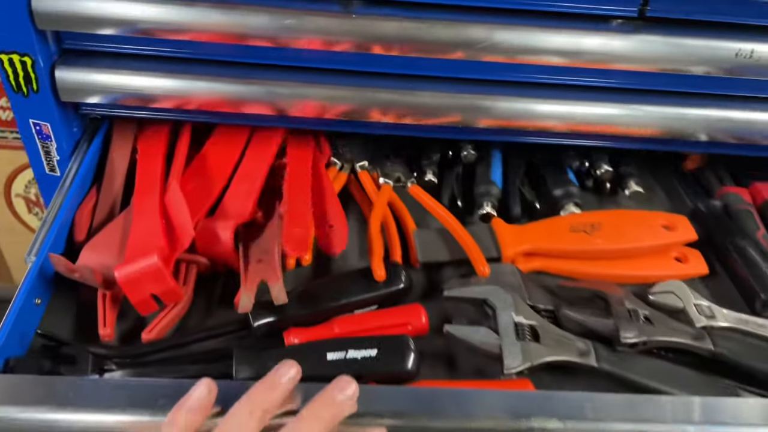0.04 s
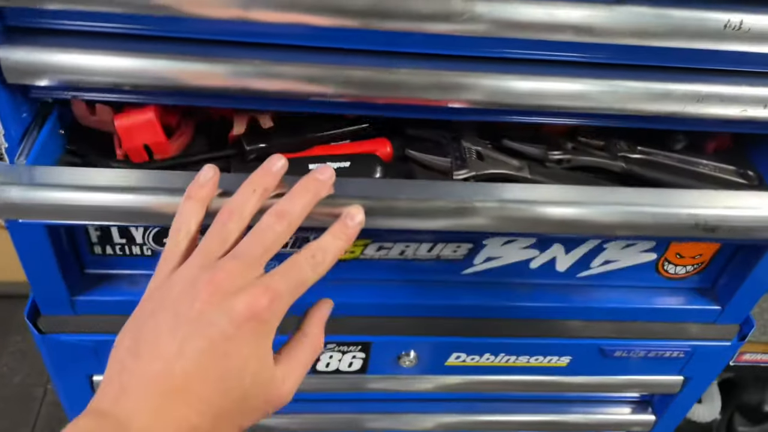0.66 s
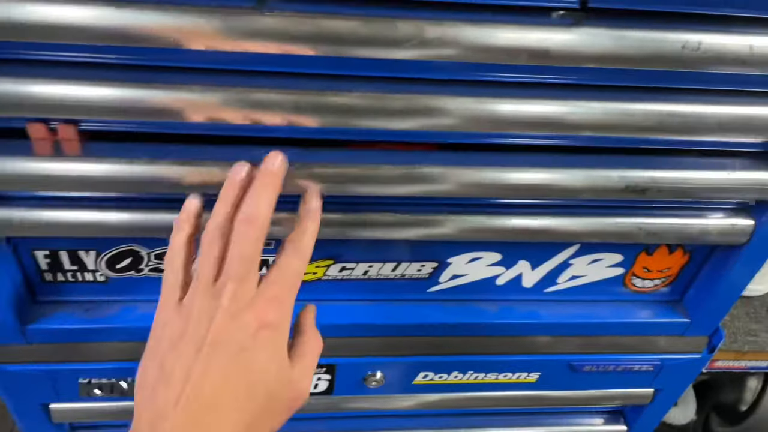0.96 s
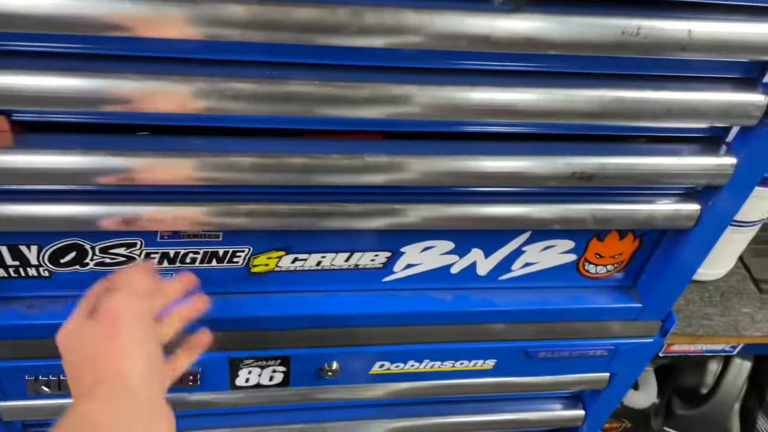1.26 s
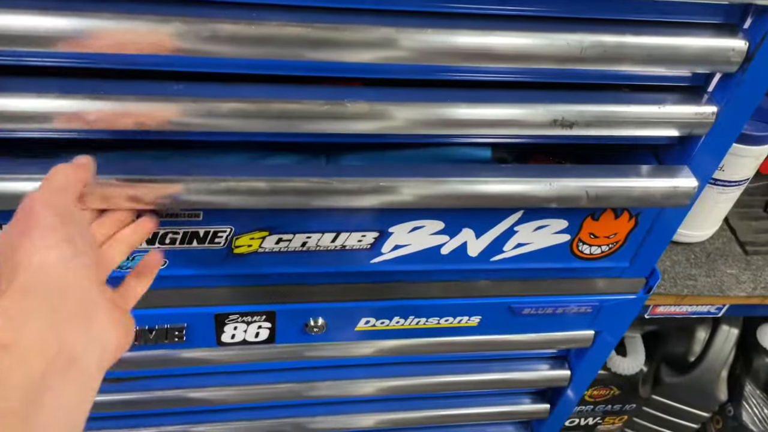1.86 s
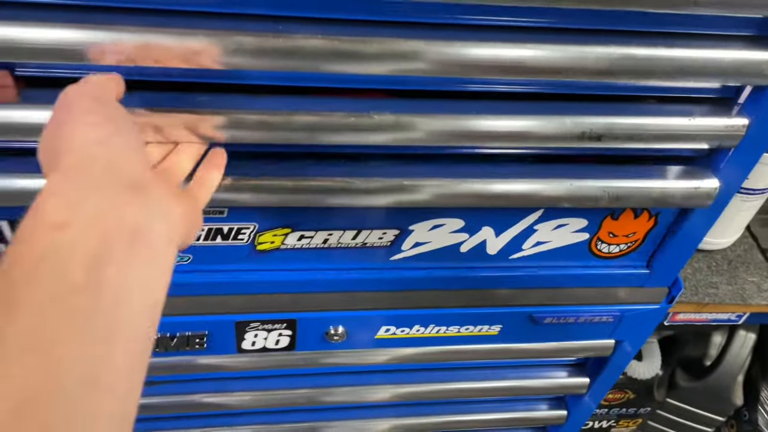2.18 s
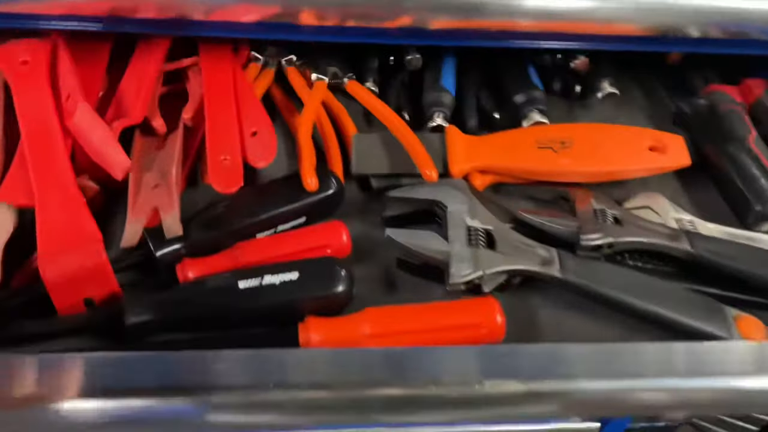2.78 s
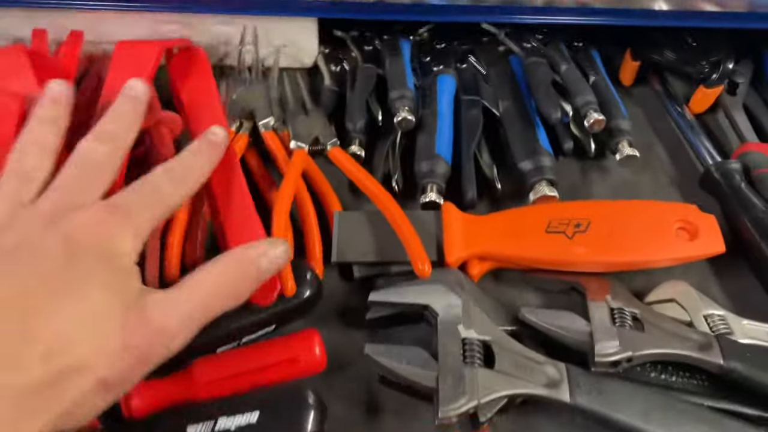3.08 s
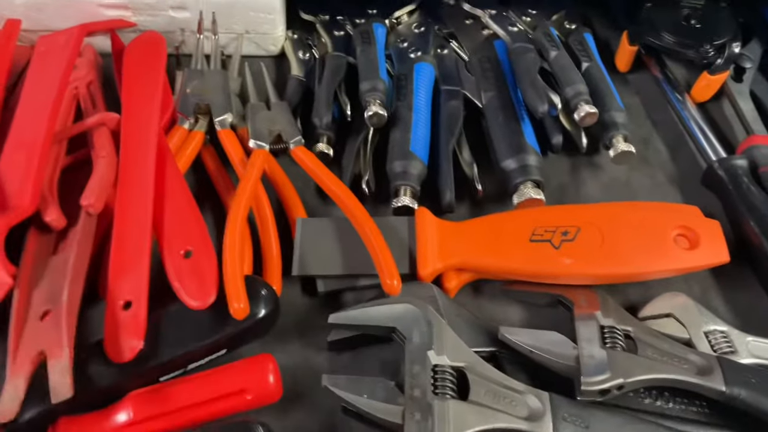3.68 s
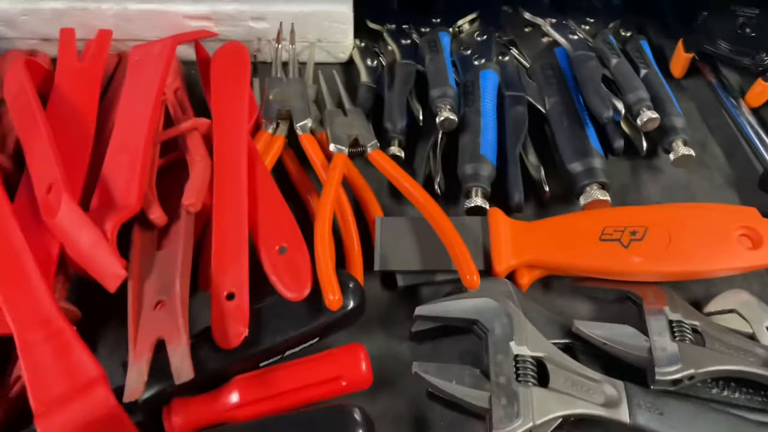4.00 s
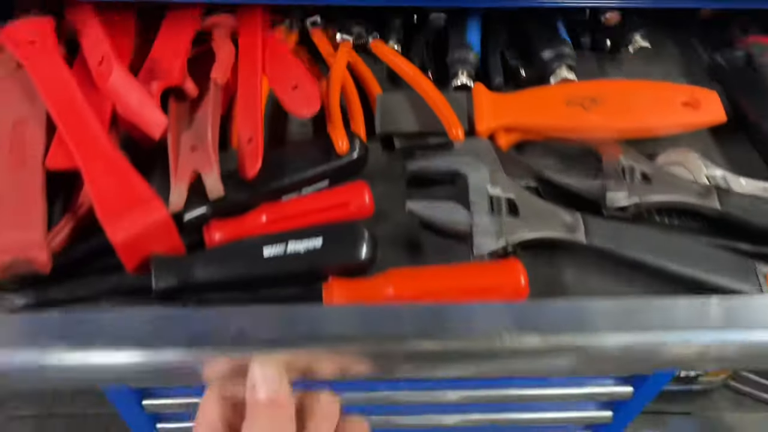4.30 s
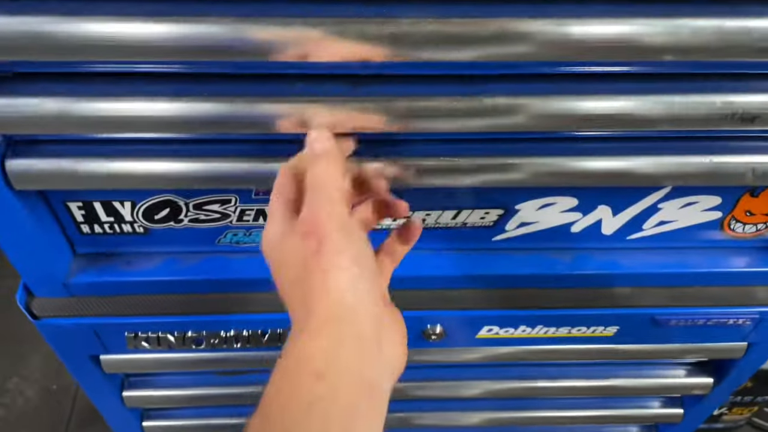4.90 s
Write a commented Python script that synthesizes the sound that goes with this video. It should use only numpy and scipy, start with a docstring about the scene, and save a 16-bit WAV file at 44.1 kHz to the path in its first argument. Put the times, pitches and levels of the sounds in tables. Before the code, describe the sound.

Loose steel tools knock and rattle as a tool chest drawer is pushed shut on rumbling slides, ending in a hollow metal thud. A sharp click and a jolt follow as it is pulled back out. Plastic pry tools clatter briefly under a hand, then the drawer slides in and closes with a heavy slam. The microphone is close, in an otherwise quiet garage.

```python
"""In a garage, close by, a loaded tool-chest drawer is pushed shut, tugged open, rummaged in and slammed.
Ball-bearing slides rumble and judder with the strokes, loose steel tools knock and clink,
and a hand shuffles plastic levers. Every hard jolt sets the sheet-steel cabinet booming
and the load shivering, and the walls answer with a short, dull tail."""
import sys
import numpy as np
from scipy import signal
from scipy.fft import rfft, irfft, next_fast_len
from scipy.io import wavfile

SR = 44100
rng = np.random.default_rng(int(sys.argv[2]) if len(sys.argv) > 2 else 0)


def output_pcm(signal):
    """Save a mono or channel-first signal as 16-bit PCM at the path in sys.argv[1].

    Samples are clipped to [-1, 1] before scaling.
    """
    pcm = np.clip(np.atleast_2d(signal).T, -1, 1) * 32767
    wavfile.write(sys.argv[1], SR, np.round(pcm).astype(np.int16))


N = 222693
TIME = np.arange(N) / SR

# the drawer is nudged, jerked out of its catch, meets a stop or rebounds:
# (time [s], level [dB], contact time [ms], ring time [factor], shaking of the load [dB])
JOLTS = [(0.401, -34.5, 1.1, .25, 2), (0.865, -29.5, 3.0, 0.66, -2), (0.886, -10, 3.0, 0.75, -2),
         (0.935, -25.5, 4.9, 0.87, -2.5), (1.172, -25.5, 9, .6, -19.5), (1.313, -25, 5, 0.45, -4.5),
         (1.659, -41.5, 0.38, 0.12, 2), (2.272, -12.5, 2.4, 0.35, -3.5), (2.296, -17, 1.7, 0.83, 6.5),
         (4.810, -5.5, 1.8, 0.61, 1), (4.829, -10, 4.1, 0.85, 10), (4.995, -18, 1.1, .6, -14)]
# hollow resonances of the drawer's steel box and runners: (frequency [Hz], width [Hz], level [dB])
DRAWER_RESONANCES = [(300, 40, -6.5), (419, 30, -5.5), (533, 30, -0.5), (676, 26, -4), (830, 50, -4.5),
                     (1000, 71, -1), (1070, 45, -2), (1196, 69, -1.5), (1345, 60, 0.5), (1500, 25, -3),
                     (1640, 70, -2), (2290, 45, -2), (3030, 40, -0.5)]
# tone of the chest's low boom: (frequency [Hz], level [dB])
BOOM_EQ = [(25, -25.5), (50, -5.5), (75, 2), (115, 8), (180, 6), (240, -5), (400, -50)]
# tone of the load's bright rattle: (frequency [Hz], level [dB])
RATTLE_EQ = [(1200, -13.5), (2200, 7.5), (3200, -8), (5500, -5), (7500, -7), (10500, -12), (12500, -13.5),
             (15000, -23.5)]


def undb(db):
    """Decibels to gain."""
    return np.exp(np.asarray(db) * (np.log(10) / 20))


def unit(x):
    """Scale to rms 1."""
    return x / np.sqrt(np.mean(x ** 2))


def gains(eq, size):
    """An EQ curve as gains on the bins of a transform."""
    hz, db = np.transpose(eq)
    return undb(np.interp(np.log(np.fft.rfftfreq(size, 1 / SR) + 1), np.log(hz), db))


def colour(x, eq):
    """Minimum-phase EQ, so attacks stay sharp."""
    size = next_fast_len(x.shape[-1] + 2048, True)
    cepstrum = irfft(np.log(gains(eq, size)), size)
    cepstrum[1:size // 2] *= 2
    cepstrum[size // 2 + 1:] = 0
    return irfft(rfft(x, size) * np.exp(rfft(cepstrum)), size)[..., :x.shape[-1]]


def passband(x, order, hz, kind):
    """Butterworth low-, high- or band-pass."""
    return signal.sosfilt(signal.butter(order, hz, kind, fs=SR, output="sos"), x)


def stereo_noise(length):
    """Noise that is wide in the treble and nearly mono in the bass."""
    # stereo width: (frequency [Hz], side minus mid [dB])
    width = [(60, -20), (130, -20.5), (220, -20), (380, -8), (700, -8), (1400, -5), (4000, -4.5),
             (11000, -13.5)]
    mid, side = rng.standard_normal((2, length))
    size = next_fast_len(length, True)
    side = irfft(rfft(side, size) * gains(width, size), size)[:length]
    return np.array([mid + side, mid - side])


def pan(db):
    """Gains that put the left db above the right."""
    return undb(np.array([[db], [-db]]) / 2)


def fade(t, t60):
    """Free decay, 60 dB down after t60 seconds."""
    return np.exp(-np.log(1000) * t / max(t60, 1e-3))


def add(out, s, x):
    """Mix x in at time s."""
    i = max(int(s * SR), 0)
    out[:, i:i + x.shape[-1]] += x[..., :max(N - i, 0)]


def ring(t, hz, t60):
    """One damped mode; higher ones differ more in phase between left and right."""
    skew = rng.standard_normal() * min((hz / 1000) ** 2, .6) * np.array([[1], [-1]])
    alive = t[:np.searchsorted(t, 1.25 * t60)]
    out = np.zeros((2, len(t)))
    out[:, :len(alive)] = np.sin(np.float32(2 * np.pi * hz * alive + skew)) * fade(alive, t60)
    return out


def tones(table, rise_t60):
    """Lone damped modes, one for each row."""
    out, t = np.zeros((2, N)), TIME[:SR]
    for s, hz, db, t60 in table:
        add(out, s, undb(db) * ring(t, hz, t60) * (1 - fade(t, rise_t60)))
    return out


def grains(per_s, scatter_db, t60):
    """Many tiny contacts of uneven size, each a short noise burst."""
    clicks, hit = np.zeros(N), rng.random(N) < per_s / SR
    clicks[hit] = undb(scatter_db * np.minimum(rng.exponential(size=N)[hit], 4))
    energy = signal.lfilter([1], [1, -fade(1 / SR, t60) ** 2], clicks ** 2)
    return stereo_noise(N) * np.sqrt(energy)


def wander(per_s):
    """Smooth random drift with a spread near 1."""
    steps = rng.standard_normal(size=400)
    return 1.2 * np.interp(TIME * per_s, np.arange(len(steps)), steps)


def resonate(x, table, surge_db):
    """A body's resonances; each swells and ebbs by about surge_db as the point of contact moves."""
    out = 0
    for hz, width, db in table:
        peak = signal.lfilter(*signal.iirpeak(hz, hz / width, fs=SR), x)
        out = out + undb(db + surge_db * wander(per_s=14)) * peak
    return out


def gesture(start, end, db, change_db, release_t60):
    """Envelope of one movement: a quick attack, a steady swell or ebb, a release."""
    elapsed = np.clip(TIME - start, 0, end - start)
    attack = 1 - np.exp(-elapsed / 0.018)
    release = fade(np.maximum(TIME - end, 0), release_t60)
    return undb(db + change_db * elapsed / (end - start)) * attack * release


def shudder(db, t60):
    """Envelope of the load's shaking: each jolt kicks it in proportion, then it dies away."""
    power = np.zeros(N)
    for s, jolt_db, *_, shake_db in JOLTS:
        i = int(s * SR)
        power[i:] += (undb(jolt_db + shake_db + db) * fade(TIME[:N - i], t60)) ** 2
    return np.sqrt(power)


def garage_air():
    """The still air of the garage: a faint, dark bed of noise."""
    # room tone: (frequency [Hz], level [dB])
    air_eq = [(30, 1.5), (70, 5), (200, -11.5), (500, -18), (2000, -30.5), (8000, -44.5), (15000, -47.5)]
    return unit(colour(stereo_noise(N), air_eq)) * undb(-65.5)


def slides():
    """Balls roll over the rails and clatter in the box, and tools shiver, in strokes and after jolts."""
    # the hand moves the drawer; far out the runners scrape, far in they rumble:
    # (start [s], end [s], starting level [dB], change by the end [dB], grit: rattle up, rumble down [dB])
    strokes = [(-.1, 0.254, -53, -1.5, 5), (0.252, 0.572, -41, 1.5, 2.5), (.59, 0.885, -37, 2.5, 4),
               (1.5, 1.676, -67.5, 1.5, 4), (1.682, 1.83, -56, 7.5, 0.5), (1.796, 1.94, -50, 1.5, -8.5),
               (2.117, 2.662, -36, -12, 2), (2.72, 2.938, -46.5, -5, 1.5), (4.08, 4.44, -39.5, -9, 5),
               (4.477, 4.744, -39.5, -7.5, -6)]
    # tone of the rumbling tray: (frequency [Hz], level [dB])
    tray_eq = [(35, -33), (80, -9.5), (110, -3.5), (138, 6), (200, 2), (250, -8.5), (400, -38.5)]
    # tone of the rolling balls: (frequency [Hz], level [dB])
    ball_eq = [(130, -18), (220, -2.5), (380, -1), (560, -5), (850, -9.5), (1300, -10.5), (2000, -11.5),
               (3000, -21.5), (6000, -33.5)]
    speeds = np.array([gesture(*stroke[:4], release_t60=0.44) for stroke in strokes])
    grit = undb([stroke[-1] for stroke in strokes])[:, None]
    gritty, smooth = (speeds * grit).sum(axis=0), (speeds / grit).sum(axis=0)
    uneven_rails = undb(2 * wander(per_s=25))
    shaken = shudder(db=-16.5, t60=.65)
    rumble = unit(colour(grains(per_s=280, scatter_db=3, t60=0.067), tray_eq)) * smooth * undb(-0.5)
    boom = unit(colour(stereo_noise(N), BOOM_EQ)) * shudder(db=-16, t60=2)
    balls = colour(grains(per_s=330, scatter_db=2, t60=0.061), ball_eq)
    rolling = unit(undb(-4.5) * balls + resonate(balls, DRAWER_RESONANCES, surge_db=4))
    split_hz = 1100  # above this the rolling comes and goes with the grit
    hollow = passband(rolling, 5, split_hz, "low") * np.hypot(uneven_rails * speeds.sum(axis=0), shaken)
    scrape = passband(rolling, 5, split_hz, "high") * np.hypot(uneven_rails * gritty * undb(-1.5), shaken)
    rattle = unit(colour(grains(per_s=350, scatter_db=4, t60=.055), RATTLE_EQ))
    rattle *= np.hypot(gritty * undb(-12), shudder(db=-26.5, t60=0.59))
    return rumble + boom + (hollow + scrape + rattle) * pan(2.3)


def low_bumps():
    """Soft low bumps and hums from the drawer, its load and microphone handling."""
    # low bumps: (time [s], pitch [Hz], level [dB], t60 [s])
    bumps = [(0.264, 329, -36.5, .14), (0.63, 325, -31, 0.18), (0.703, 360, -24.5, .07),
             (0.834, 304, -21, 0.077), (3.004, 266, -23, 0.29), (3.01, 78, -39, 0.87),
             (3.020, 122.5, -30.5, 0.33), (3.055, 162, -18.5, 0.11), (3.118, 260, -24, 0.088),
             (3.264, 314, -13.5, 0.027), (3.292, 350, -30.5, .07), (3.326, 300, -22.5, 0.058),
             (4.105, 95, -36, .15), (4.197, 297, -28.5, 0.11), (4.228, 167.4, -30.5, 0.22)]
    return tones(bumps, rise_t60=0.0053)


def tool_noise(size, depth_db, spacing_hz):
    """The dense modes of one tool: noise with its own random peaks and valleys."""
    hz = np.fft.rfftfreq(size, 1 / SR)
    knots = np.clip(rng.standard_normal(size=200), -2, 2)
    ripple = np.interp(hz / spacing_hz, np.arange(len(knots)), knots)
    shape = undb(depth_db * np.minimum(hz / 1500, 1) * ripple)
    return irfft(rfft(stereo_noise(size)) * unit(shape), size)


def knocks(table, bands_db, main_db, crack_db, tail_db, tail_t60, ring_db, ring_t60,
           low_hold, scrape_db, scrape_t60, rise_s):
    """A brief scrape, a crack, then dense modes, the low ones later and longer; the tool rings on."""
    out, lead = np.zeros((2, N)), SR // 40
    t = TIME[:SR // 5] - TIME[lead]
    after, before = np.maximum(t, 0), np.maximum(-t, 0)
    edges_hz, pivot_hz = [150, 700, 2200, 7500, 14000], 2000
    scrape = undb(scrape_db) * fade(before, scrape_t60) * fade(after, 0.018)
    for s, level_db, tilt_db, main_hz, t60 in table:
        noise = tool_noise(len(t), depth_db=5, spacing_hz=170)
        looseness = min(t60 / 0.1, 1.2) ** 2  # a chattering contact builds more slowly than a crisp one
        soft_db = min(tilt_db, 0)  # a soft contact loses crack and narrows to the middle band
        mode_t60 = min(ring_t60, t60)
        main_mode = undb(main_db) * ring(after, main_hz, mode_t60)
        blow = 0
        for lo, hi, db in zip(edges_hz, edges_hz[1:], bands_db):
            height = lo / edges_hz[1]
            rise = 1 - np.exp(-after / (rise_s * looseness + .5 / lo))
            tail = undb(tail_db) * fade(after, tail_t60 * height ** -.12)
            decay = fade(after, t60 * height ** -low_hold) + tail
            dense = unit(passband(noise, 3, (lo, hi), "band")) * (decay * rise + scrape * looseness)
            partials = sum(ring(after, hz, mode_t60 * height ** -.25) for hz in rng.uniform(lo, hi, 3))
            partials += (lo <= main_hz < hi) * main_mode
            octaves = np.log2(np.sqrt(lo * hi) / pivot_hz)
            band_db = db + tilt_db * octaves + 0.29 * soft_db * np.log2(height) ** 2
            blow = blow + undb(band_db) * (dense + undb(ring_db) * rise * partials)
        crack = noise * (t > 0) * fade(after, 0.0073) * undb(crack_db + 0.71 * soft_db - 2 * looseness)
        add(out, s - TIME[lead], undb(level_db) * (blow + crack))
    return out


def steel_knocks():
    """Slides, latch and loose steel tools knock on the drawer and ring its hollow box."""
    # steel contacts: (time [s], level [dB], tilt [dB/octave], main mode [Hz], base t60 [s])
    hits = [(0.339, -26, 3.5, 4760, 0.024), (0.35, -24.5, 2, 1600, 0.066),
            (0.398, -30.5, -0.5, 1460, 0.077), (0.484, -34.5, -3.5, 1380, 0.12),
            (0.503, -32, -5, 1700, 0.04), (0.593, -25, -0.5, 2170, 0.074), (0.626, -30.5, 2.5, 5600, .05),
            (0.633, -27, 1, 2030, 0.06), (0.65, -28, -2.5, 1086, 0.067), (0.690, -22, 1.5, 5900, 0.049),
            (0.705, -15, 2.5, 3014, 0.086), (0.716, -17, 1.5, 3800, 0.044), (0.778, -22, 0.9, 1290, 0.32),
            (0.807, -19.5, 0.5, 2100, 0.14), (0.835, -14, 2, 1220, 0.063), (0.855, -15.5, 1, 1430, 0.099),
            (0.874, -9.5, 2.5, 1357, 0.16), (0.893, -15, -2, 1528, .13), (0.909, -11.5, 1, 1240, 0.087),
            (0.921, -14.5, -0.8, 1420, 0.076), (0.944, -20.5, 2.6, 1370, 0.19),
            (1.053, -29.5, 2.5, 4990, 0.063), (1.072, -24.5, -0.5, 1240, 0.078),
            (1.101, -30, 1, 4000, 0.033), (1.11, -30.5, -1, 4620, 0.13), (1.312, -43, -4.5, 1180, 0.1),
            (1.377, -42, -3, 1174, 0.094), (1.695, -50, 0.7, 1943, 0.092), (1.847, -32.5, 0, 5900, 0.073),
            (1.878, -39, -2.5, 1240, 0.087), (1.988, -50.5, -6, 1000, 0.023),
            (2.063, -51, -3.5, 1500, 0.11), (2.118, -16.5, 2.5, 1910, 0.051),
            (2.206, -26.5, -1, 1270, 0.026), (2.262, -25.5, 0, 1420, 0.23), (2.278, -20, -1.5, 1210, .12),
            (2.302, -16.5, -1.2, 1646, 0.099), (2.33, -26.5, 0, 1450, 0.09), (2.365, -20, -1.5, 1246, 0.08),
            (2.4, -23.5, 0.5, 1340, 0.12), (2.483, -24.5, -0.5, 1640, 0.11), (2.576, -32, -2, 1300, 0.065),
            (2.799, -31, -3.5, 1267, 0.047), (3.971, -37, -2, 1314, 0.11), (4.044, -37.5, -2.5, 1223, 0.12),
            (4.086, -31, -3.5, 2440, 0.044), (4.11, -37, -1.5, 1053, 0.1), (4.168, -21.5, 1, 1145, 0.047),
            (4.192, -26, 1, 3600, 0.032), (4.199, -21, -2.5, 6000, 0.021), (4.237, -34, -2.5, 2290, 0.085),
            (4.41, -40, -4, 1600, 0.14), (4.462, -28.5, -0.5, 1350, 0.14),
            (4.483, -24.5, -2.5, 1053, 0.075), (4.729, -22.5, 3, 1940, 0.094),
            (4.809, -9, 0.1, 1150, 0.077), (4.82, -13, -1.5, 1830, 0.1), (4.841, -22, 4, 4180, 0.13),
            (4.866, -23, 1.5, 1350, 0.22), (4.94, -26.5, -4, 1220, 0.15), (4.995, -23.5, -4, 710, 0.076),
            (5.018, -27, 2.5, 4460, 0.044)]
    steel = knocks(hits, bands_db=(-5, -0.24, -4, -7.5), main_db=6, crack_db=-2.6,
                   tail_db=-22.5, tail_t60=0.29, ring_db=-6.5, ring_t60=0.082,
                   low_hold=0.28, scrape_db=-10.5, scrape_t60=0.038, rise_s=0.0015)
    return (steel + undb(-8.5) * resonate(steel, DRAWER_RESONANCES, surge_db=0)) * pan(1.2)


def cabinet_boom():
    """Each jolt rings the same steel panels; a longer contact softens the higher modes."""
    # panel modes: (frequency [Hz], level [dB], base t60 [s])
    panel_modes = [(61.4, -24.5, 2.1), (79.4, -20, 2.8), (78, -19, 0.33), (106.4, -2.5, 0.52),
                   (119.9, -3, 1.54), (126.6, -9.5, 1.1), (141.1, -0.5, 0.6), (152.6, -0.5, 0.5),
                   (164.4, -9, 0.9), (180.4, -2, 0.55), (281.3, -12, 0.77), (312.7, -16, .8),
                   (336, -13, 0.5), (379, -18, 0.48), (423, -15, 0.35), (498, -7.5, 0.4), (527, -9, 0.7),
                   (615, -1.5, 0.22), (684, -6, 0.4), (790, -6.5, 0.3), (850, -10, 0.98), (940, -8, .9),
                   (1036, -13, 1.2), (1143, -8.5, 0.7), (1260, -13.5, .5), (1362, -5, 0.3),
                   (1506, -9, 0.53), (1611, -12, .3), (1880, -10.5, 0.88)]
    out, t = np.zeros((2, N)), TIME[:int(SR * 1.4)]
    for s, db, contact_ms, hold, _ in JOLTS:
        corner_hz = 1000 / (2 * contact_ms)
        panels = 0
        for hz, mode_db, t60 in panel_modes:
            longest_t60 = .42 * (hz / 1000) ** -.6  # the load lying on the steel damps the higher modes
            gain = undb(mode_db) / np.hypot(1, hz / corner_hz)
            panels = panels + gain * ring(t, hz, min(t60 * hold, longest_t60))
        add(out, s, undb(db) * panels * (1 - fade(t, 0.059)))
    return out


def bright_rings():
    """Short bright rings from tools, clacking levers and the slammed sheet steel."""
    # bright rings: (time [s], pitch [Hz], level [dB], t60 [s])
    rings = [(0.884, 3070, -24, 0.12), (0.950, 4600, -19.5, 0.069), (0.950, 11250, -23, 0.05),
             (0.967, 5530, -19.5, 0.051), (1.054, 4900, -20, 0.021), (1.111, 4400, -14.5, .01),
             (2.119, 1980, -15, 0.087), (2.119, 3870, -8.5, 0.009), (2.401, 1490, -27.5, 0.21),
             (3.002, 2960, -19.5, 0.023), (3.105, 3430, -26.5, .04), (2.401, 4600, -29, 0.047),
             (2.447, 3100, -30.5, 0.082), (2.982, 4300, -24, .03), (4.086, 2463, -12, 0.0065),
             (4.86, 12870, -20, 0.3), (5.019, 4730, -23, 0.031), (4.812, 1874, -13, 0.12),
             (4.835, 1437, -22, 0.26), (4.812, 2450, -34, 0.24)]
    return tones(rings, rise_t60=0.0017)


def runner_judder():
    """A runner sticks and slips, each slip the same small knock, weaker as the drawer slows."""
    # runs of slips: (time [s], length [s], slip rate [Hz], level [dB])
    slip_runs = [(0.975, 0.2, 105.7, -10), (1.855, 0.12, 101.8, -16.5), (2.403, 0.13, 101.4, -18)]
    # tone of one slip: (frequency [Hz], level [dB])
    slip_eq = [(100, 1.5), (210, 2.5), (320, -6), (420, 5.5), (530, -0.5), (640, -17), (850, -12),
               (2000, -18), (6000, -55.5)]
    out, t = np.zeros((2, N)), TIME[:SR // 20]
    for s, length_s, slips_hz, db in slip_runs:
        scuff = stereo_noise(len(t)) * fade(t, 0.04) * undb(-10)
        click = undb(17.5) * (t == 0)
        knock = colour(scuff + click, slip_eq)
        for at in np.arange(0, length_s, 1 / slips_hz):
            late, size = rng.standard_normal(2)
            add(out, s + at + .00015 * late, knock * undb(db + 1.5 * size - 8 * (at / length_s) ** 2))
    return out


def tray_flex():
    """The tray flexes and hums as it is jerked out of its catch."""
    # flexing modes: (frequency [Hz], level [dB], t60 [s])
    tray_modes = [(83.7, -19.5, 1.14), (88.2, -19, 0.81), (139.2, -31, 2.4)]
    release_s = 2.274
    return tones([(release_s, *mode) for mode in tray_modes], rise_t60=0.13)


def lever_clacks():
    """Plastic levers and grips clack as they shift under the hand."""
    # plastic contacts: (time [s], level [dB], tilt [dB/octave], main mode [Hz], base t60 [s])
    hits = [(2.982, -26, 3, 4300, 0.045), (3.002, -13.5, 2, 2840, .04), (3.011, -17.5, 3.5, 3320, 0.04),
            (3.022, -24.5, 4, 4160, 0.053), (3.029, -24, -2, 6100, 0.056), (3.036, -16, 2.5, 5960, 0.051),
            (3.049, -30.5, 6, 6000, .04), (3.055, -18.5, 2, 2770, .05), (3.062, -28.5, 3, 3700, .04),
            (3.088, -33, 6, 4220, .02), (3.104, -25, 0, 3370, 0.045), (3.137, -34, 2.5, 3470, 0.077),
            (3.178, -34.5, 2, 3300, 0.03), (3.194, -30, -1, 3020, 0.031), (3.236, -24, 1, 4200, 0.026),
            (3.267, -34, 3, 4560, 0.074), (3.307, -29, .5, 4070, 0.076), (3.319, -26, -1, 4600, 0.017),
            (3.323, -33, -3.5, 2260, 0.05), (3.487, -54.5, -6, 2590, 0.046)]
    return knocks(hits, bands_db=(-1.9, -1, -2.5, -9.5), main_db=0, crack_db=-5.5,
                  tail_db=-18.5, tail_t60=0.25, ring_db=-6, ring_t60=0.06,
                  low_hold=0.35, scrape_db=-5.5, scrape_t60=0.04, rise_s=0.0022) * pan(3.05)


def rummage():
    """The hand leans on the tray; dragged levers catch and slip, and the heap crackles as it gives."""
    # the hand's sweep: (start [s], end [s], starting level [dB], change by the end [dB])
    hand_sweep = (3.0, 3.33, -39.5, -2)
    # a lever is dragged over its neighbours: (start [s], end [s], level [dB])
    lever_drags = [(3.017, 3.065, -29.5), (3.147, 3.159, -29.5), (3.242, 3.357, -39.5),
                   (3.411, 3.437, -52.5)]
    # hollow resonances of the heap of levers: (frequency [Hz], width [Hz], level [dB])
    heap_resonances = [(300, 80, 2.5), (560, 63, -1.5), (790, 90, 3), (1040, 150, 3), (3180, 900, -22)]
    thud = unit(colour(stereo_noise(N), BOOM_EQ)) * gesture(*hand_sweep, release_t60=0.76) * undb(-5)
    slips = grains(per_s=270, scatter_db=2.5, t60=0.02)
    pull = sum(gesture(*row, change_db=1, release_t60=0.14) for row in lever_drags)
    pull += gesture(*hand_sweep, release_t60=0.2) * undb(-5)
    drag = unit(resonate(slips, heap_resonances, surge_db=5.5)) * pull
    start = hand_sweep[0]
    giving_way = gesture(start, start + 0.074, db=-36, change_db=-3.5, release_t60=0.37)
    crackle = unit(colour(grains(per_s=300, scatter_db=6, t60=0.025), RATTLE_EQ)) * giving_way
    return thud + (drag + crackle) * pan(2.5)


def garage_walls(x, wet_db, t60, treble_t60):
    """The walls return a short diffuse tail that dulls as it dies."""
    t = TIME[:SR * 3 // 4]
    noise = stereo_noise(len(t))
    low = passband(noise, 2, 2500, "low")
    tail = low * fade(t, t60) + .5 * (noise - low) * fade(t, treble_t60)
    tail = passband(tail * (1 - fade(t, 0.023)), 2, 220, "high")
    tail /= np.sqrt(np.sum(fade(t, t60) ** 2))
    return undb(wet_db) * signal.fftconvolve(x, tail, axes=1)[:, :N]


def scene():
    """Chest, tools and reverb over the still air of the garage."""
    near = steel_knocks() + lever_clacks() + tray_flex() + low_bumps() + bright_rings()
    near += cabinet_boom() + runner_judder() + slides() + rummage()
    return near + garage_walls(near, wet_db=-10.5, t60=0.35, treble_t60=0.29) + garage_air()


def record(dry):
    """Two microphone ports colour the sound and part in phase; peaks are rounded and the top is cut."""
    # microphone colour: (frequency [Hz], level [dB])
    mic_eq = [(36, -5.5), (58, 6.5), (100, 2.5), (250, 2.5), (400, 2), (550, -3), (800, 2), (1300, -3.5),
              (1900, -7.5), (2500, -5.5), (3200, -0.5), (5800, -5), (7500, -10), (10500, -3), (12500, -11),
              (14500, -17)]
    # the ports drift apart in the treble: (frequency [Hz], phase difference [turns])
    port_phase = [(5800, 0), (7500, .5), (9300, .88), (12000, 1.08), (14300, 1.5), (16000, 1.7)]
    size = next_fast_len(N + SR // 10, True)
    turns = np.interp(np.fft.rfftfreq(size, 1 / SR), *np.transpose(port_phase))
    twist = np.exp(-1j * np.pi * turns * np.array([[1], [-1]]))
    ports = irfft(rfft(colour(dry, mic_eq), size) * twist, size)[:, :N]
    top_cut = signal.ellip(8, .2, 70, 16000, fs=SR, output="sos")
    return signal.sosfilt(top_cut, np.tanh(ports))


dry = scene()
out = record(dry)
output_pcm(out)
```